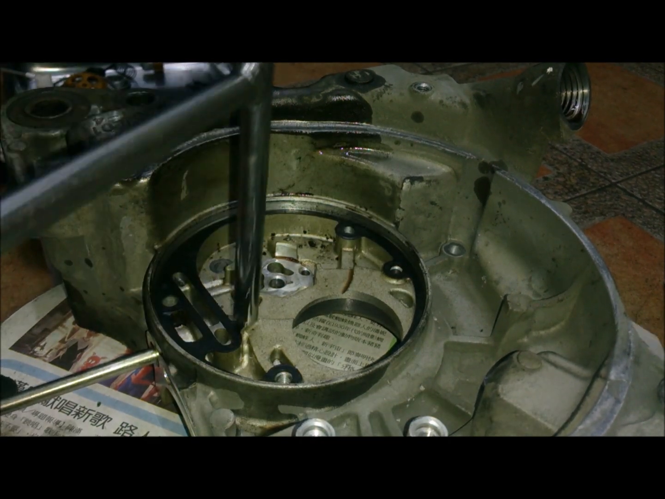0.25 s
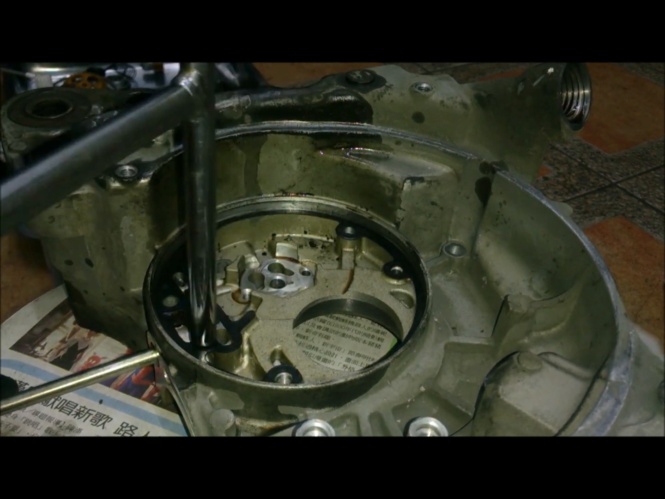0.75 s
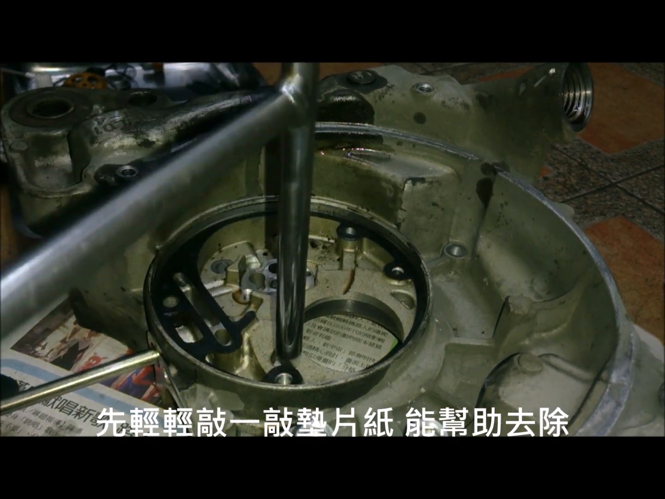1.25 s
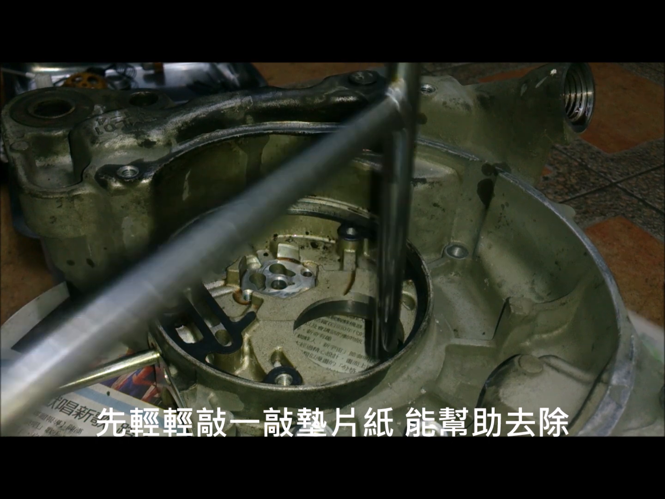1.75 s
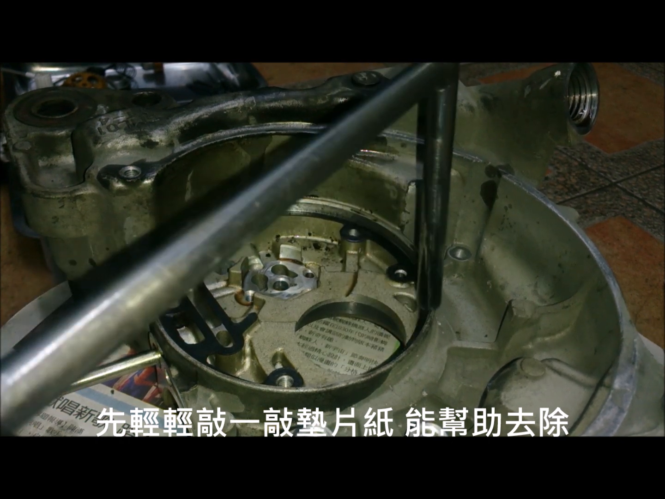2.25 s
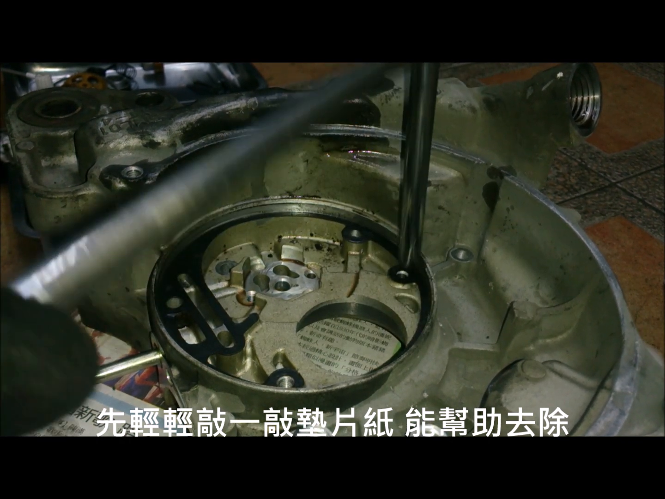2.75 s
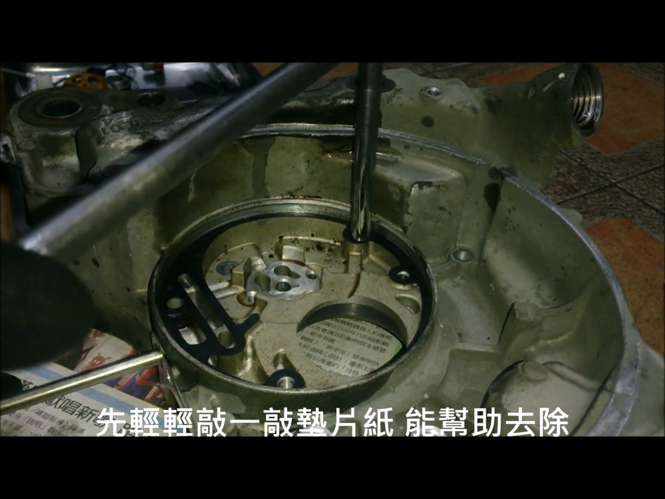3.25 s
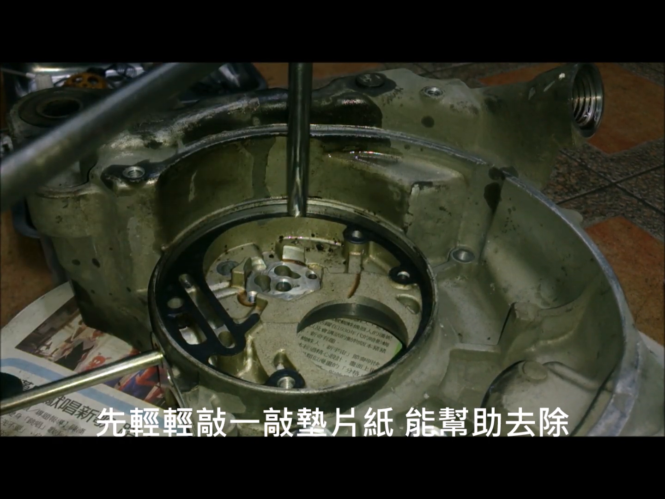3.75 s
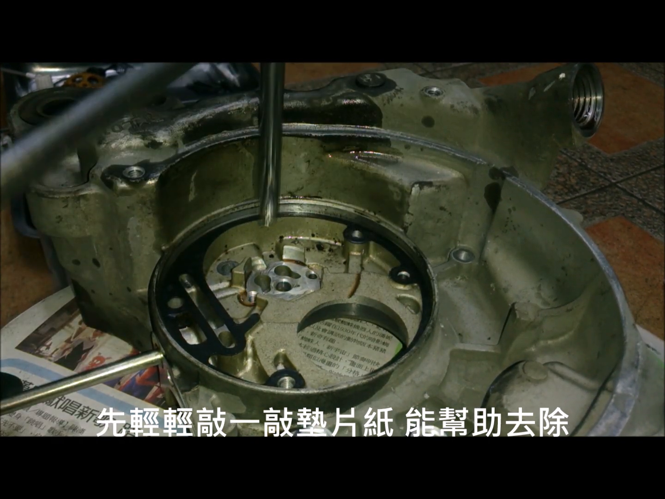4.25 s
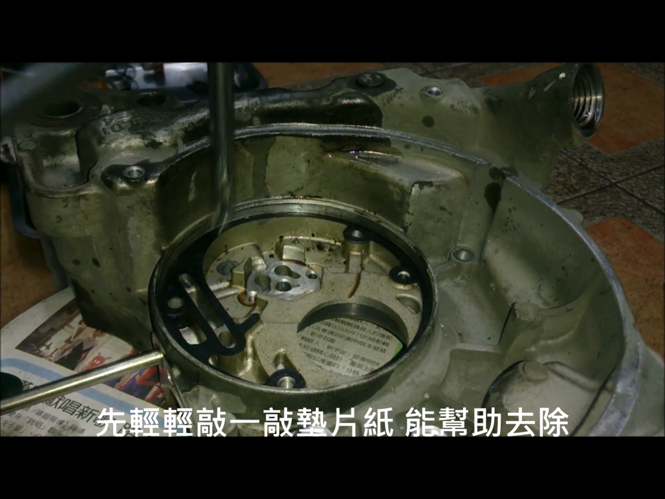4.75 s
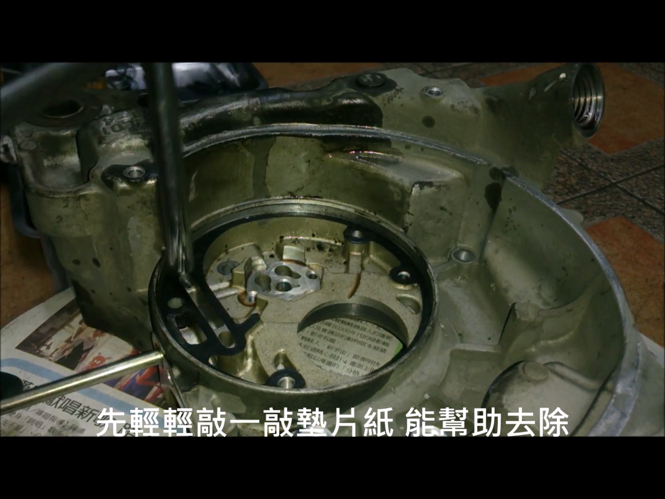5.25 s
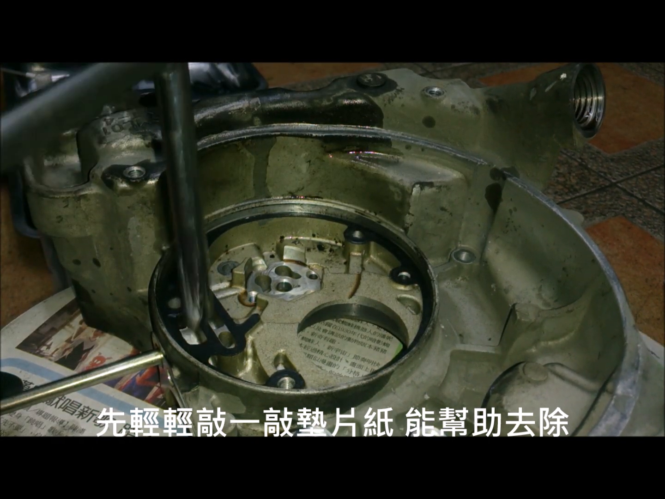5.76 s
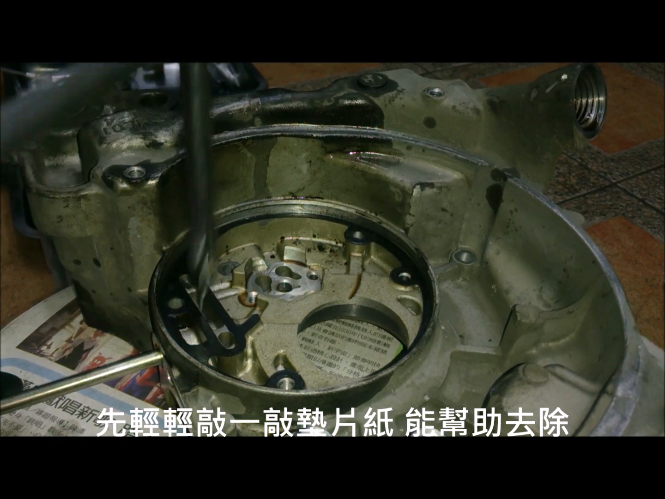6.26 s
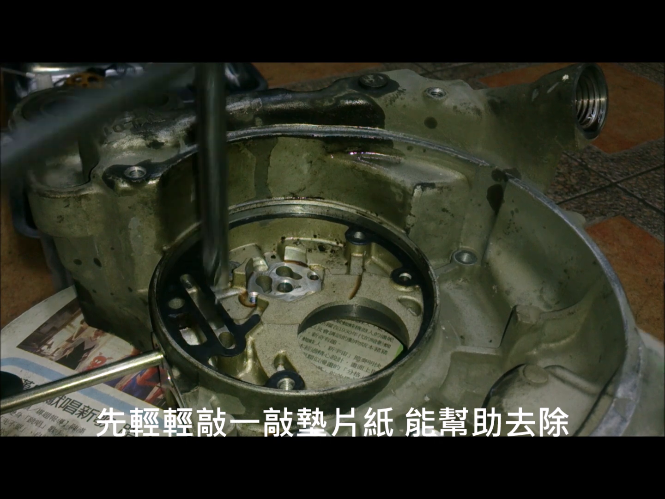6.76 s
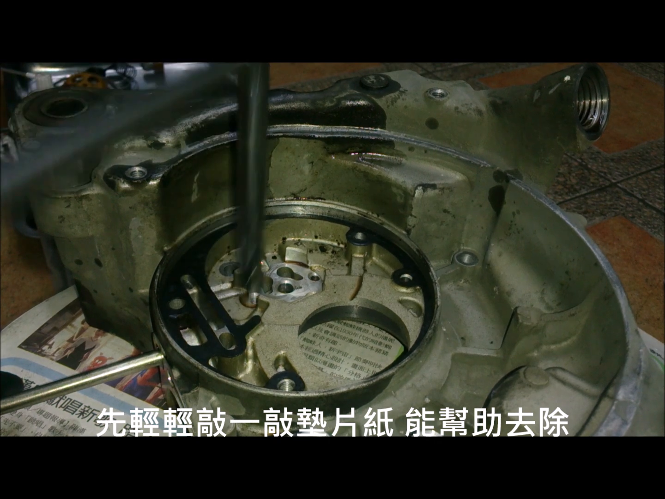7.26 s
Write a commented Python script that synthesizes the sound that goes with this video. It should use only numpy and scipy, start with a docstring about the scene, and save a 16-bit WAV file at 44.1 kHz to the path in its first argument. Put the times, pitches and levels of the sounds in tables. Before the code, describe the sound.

A steel rod raps an aluminium engine casing about sixteen times a second, bright metallic clatter with wind buffeting the microphone, mostly on the right.

```python
"""Workshop: a steel rod is tapped by hand with a steel bar against an aluminium engine casing,
played sped up, about 16 blows a second. Each blow is a noise burst (crack) plus short resonators
(casing thud, steel ringing) and a dense sizzle; which modes speak depends on spot and grip.
Decaying noise adds the room's reflections. Moving air buffets the microphone ports, mostly the right one,
as random pressure pulses; shaped noise makes a faint hiss and rumble."""
import sys
import numpy as np
from scipy import signal
from scipy.fft import rfft, irfft
from scipy.io import wavfile

SR = 44100
rng = np.random.default_rng(int(sys.argv[2]) if len(sys.argv) > 2 else 0)


def master(y):
    """Save y as 16-bit WAV."""
    cut = np.clip(np.atleast_2d(y).T, -1, 1)
    pcm = np.round(cut * 32767)  # scale
    wavfile.write(sys.argv[1], SR, pcm.astype(np.int16))


N = 331632

# blows: (time [s], crack level [dB], freedom of the steel to ring [dB])
BLOWS = [(0.2635, -22.5, -2), (0.3273, -22, -5), (0.3802, -26.5, -1.5), (0.431, -23, -37),
         (0.4957, -21.5, -8.5), (0.549, -21.5, -1), (0.6064, -22, 1), (0.666, -29.5, 11.5),
         (0.7254, -18, -20), (0.7853, -20, -18), (0.8474, -22.5, 4.5), (0.9063, -21, -2),
         (0.9618, -21.5, -12), (1.0215, -21.5, -3.5), (1.0818, -23.5, -1), (1.1418, -23, -3),
         (1.2033, -26, 10.5), (1.2611, -21, 0.5), (1.3249, -34, 16), (1.3815, -23.5, 3.5),
         (1.4405, -27.5, 10.5), (1.4945, -24.5, 5), (1.5533, -22.5, -6.5), (1.6182, -27, -7),
         (1.6692, -26.5, -6.5), (1.7169, -27.5, 11), (1.768, -32, 9.5), (1.821, -25.5, -9),
         (1.8695, -26.5, -2.5), (1.9346, -24, -3), (1.9927, -21, 1.5), (2.0634, -19, -5.5),
         (2.1535, -18, 3), (2.2327, -23.5, 7.5), (2.2976, -24.5, -8), (2.3496, -27.5, -1),
         (2.469, -26, -10), (2.5348, -23, -0.5), (2.6157, -31, -30), (2.6841, -19.5, 3), (2.7577, -16, 2),
         (2.8286, -18.5, 3.5), (2.8937, -20, -6), (2.9592, -21, 3.5), (3.0131, -22, 1.5), (3.0755, -21, -8),
         (3.19, -39.5, 5), (3.3061, -21, 3.5), (3.3604, -21.5, 1.5), (3.4107, -24, -3),
         (3.4629, -24.5, 9.3), (3.5236, -19.4, 3), (3.5958, -27, -10), (3.649, -27, -8), (3.703, -31.5, 5),
         (3.8075, -27, -5.5), (3.8714, -25.5, 4), (3.9285, -24, 7.5), (3.9813, -23.5, 3),
         (4.1607, -33, -27), (4.2185, -35, -3.5), (4.2703, -24.5, -5), (4.3203, -25.5, 12),
         (4.3705, -24, 0), (4.4112, -27, 3), (4.448, -30, -3), (4.4924, -28.5, 1), (4.5407, -26, 1),
         (4.579, -22, 0.1), (4.6357, -24, -2.0), (4.6696, -23, -1), (4.7162, -23, -2),
         (4.7683, -17.5, -8.5), (4.812, -42, 6.5), (4.8829, -16.5, -6), (4.9548, -20, 1),
         (5.023, -17.1, 1.5), (5.0896, -18.7, -1), (5.1519, -15.5, -5.5), (5.2112, -18.5, -17),
         (5.2667, -18, -10), (5.325, -18, -2.5), (5.381, -21.5, 3.5), (5.4497, -18, 1.5), (5.523, -14, -4),
         (5.5959, -17, 5.5), (5.666, -15.5, -5.5), (5.7355, -15.5, 2.5), (5.8071, -19, 1.5),
         (5.8722, -17.5, -3), (5.9437, -17.7, 1.8), (6.0105, -17.5, -0.5), (6.073, -21, 6.5),
         (6.135, -18, -9.1), (6.1992, -20, 5), (6.261, -16.5, 3), (6.3211, -17, -1.5), (6.3836, -16, -5.5),
         (6.4457, -19.9, 3), (6.5116, -12, -7), (6.5782, -16, -3.5), (6.6411, -16, -2.5),
         (6.709, -13.5, -6.5), (6.7701, -17, -3.3), (6.8372, -19.5, 3), (6.901, -21, 4), (6.9699, -17, -2),
         (7.0395, -17, -2.5), (7.107, -17, -6.5), (7.1793, -17.5, -1.3), (7.2529, -16.9, -1),
         (7.3272, -17.0, -1.5), (7.4049, -20, 3), (7.4811, -13.5, -5)]


def from_db(db):
    """Decibels to amplitude gain."""
    return 10 ** (np.asarray(db) / 20)


def rms_one(x):
    """Scale to unit rms."""
    return x / np.sqrt(np.mean(x ** 2) + 1e-20)


def at_hz(points, hz):
    """Interpolate a table over log frequency."""
    point_hz, value = np.transpose(points)
    return np.interp(np.log(hz), np.log(point_hz), value)


def bin_hz():
    """FFT bin frequencies, at least 1 Hz."""
    return np.maximum(np.arange(N // 2 + 1) * SR / N, 1)


def coloured(spectrum):
    """Stereo white noise given a spectrum; rms 1."""
    white = rng.standard_normal((2, N))
    return rms_one(irfft(rfft(white) * from_db(at_hz(spectrum, bin_hz())), N))


def drift(corner_hz):
    """Slow random wander: noise through two equal poles, rms 1."""
    r = np.exp(-2 * np.pi * corner_hz / SR)
    white = rng.standard_normal(N + SR)
    settled = signal.lfilter([1], [1, -2 * r, r * r], white)[SR:]
    return rms_one(settled)


def ring(clicks, hz, t60_s):
    """Two-pole resonator: a unit click starts a decaying sine of height about 1."""
    r = from_db(-60 / (t60_s * SR))
    w = 2 * np.pi * hz / SR
    return signal.lfilter([0, np.sin(w)], [1, -2 * r * np.cos(w), r * r], clicks + 1e-18)


def die_away(clicks, t60_s):
    """Each click becomes an exponential decay."""
    return signal.lfilter([1], [1, -from_db(-60 / (t60_s * SR))], clicks + 1e-18)


def struck(level_db):
    """One click per blow."""
    clicks = np.zeros(N)
    clicks[np.round(np.array(BLOWS)[:, 0] * SR).astype(int)] = from_db(level_db)
    return clicks


def partly_alike(first, second, share):
    """Mix two equal noises so that the result correlates with the first by share."""
    return share * first + np.sqrt(1 - share ** 2) * second


def cracks(crack_db, fall_t60_s, rise_t60_s, ports_alike):
    """A short burst of noise with a soft rise and a quick fall."""
    # (frequency [Hz], relative density [dB per Hz])
    crack_spectrum = [(700, -29), (1500, -2), (3500, 10), (4800, 3), (6000, 9), (8000, 2.5), (11000, -3.5),
                      (16000, -7.5)]
    clicks = struck(np.array(BLOWS)[:, 1])
    envelope = die_away(clicks, fall_t60_s) - die_away(clicks, rise_t60_s)
    out = from_db(crack_db) * envelope * coloured(crack_spectrum)
    out[1] = partly_alike(out[0], out[1], ports_alike)
    return out


def family_levels():
    """Level of each mode family per blow: strength, spot, freedom and chance."""
    # the rod wanders round the casing:
    # (time [s], ring level re crack of family 1 [dB], family 2 [dB], family 3 [dB], family 4 [dB])
    spots = [(0.25, -7.5, -38, -22, -21), (0.65, -9, -25, -22, -20), (1.1, -3, -31, -24.5, -27),
             (1.55, -0.5, -28, -23, -20), (1.75, -2.5, -35, -47, -27), (2.1, -16.5, -37, -40, -22.2),
             (2.6, -13.5, -27, -30.5, -20.5), (3.05, -10, -33, -33.5, -25), (3.35, -10, -21.5, -35, -30),
             (3.9, -14.5, -24, -47, -35), (4.5, -8, -24.5, -45.5, -45), (4.85, -2.5, -25, -42, -22),
             (5.15, -7.5, -20.5, -29.5, -13.5), (5.5, -12.5, -28, -25, -22.5), (6.0, -7, -47, -26.5, -29),
             (6.4, -12.5, -23, -23, -16), (6.9, -10, -25, -20.5, -15.5), (7.5, -2.5, -28, -18, -14)]
    # how far families 1 to 4 follow the freedom of the blow: (share [dB per dB])
    freedom_share = [.6, 0.75, 0.94, 1.4]
    spread_db = 1.5  # chance change of a family from blow to blow
    thud_share, thud_pivot_db = 0.23, -30

    s, crack_db, free_db = np.transpose(BLOWS)
    spot_s, *spot_db = np.transpose(spots)
    here_db = [np.interp(s, spot_s, column) for column in spot_db]
    ring_db = np.transpose([db + share * free_db for db, share in zip(here_db, freedom_share)])
    ring_db = ring_db + spread_db * rng.standard_normal(ring_db.shape)
    # where family 3 is choked, the casing thuds louder
    thud_db = thud_share * (thud_pivot_db - here_db[2])
    return np.c_[crack_db + thud_db, crack_db[:, None] + ring_db]


def ringing(family_db, spread_db, click_db, noise_db, t60_scale):
    """Every blow drives all modes; each rings roughly: a click and decaying noise drive short resonators."""
    # one row per family, family 0 is the thud: mode frequencies [Hz]
    mode_hz = [
        [330, 560, 780, 1720, 3500, 4375, 15480],
        [5890, 5960, 6150],
        [3760, 6690, 6640, 11670],
        [1870, 2870, 6820, 7080, 8768, 9745, 10100],
        [11200, 11946, 12750, 12935, 13940, 14820],
    ]
    # same layout: (relative level [dB], noise t60 and, before t60_scale, ring t60 [s])
    mode_ring = [
        [(-19.5, 0.072), (-20.5, 0.048), (-17, 0.04), (-14, 0.029), (-23, 0.045), (-23.5, 0.069), (-25, 0.039)],
        [(-1, 0.034), (0, 0.041), (-12, 0.038)],
        [(-3.5, 0.18), (2, 0.13), (-2.5, 0.19), (3.5, 0.075)],
        [(0, 0.075), (-3.5, 0.1), (-14, 0.1), (-7.5, 0.22), (8, 0.086), (2, 0.1), (7, 0.055)],
        [(3.5, 0.065), (7, 0.058), (-1, 0.047), (0, 0.048), (-9, 0.049), (4.5, 0.036)],
    ]
    ports_alike = 0.5  # noise correlation between ports

    out = np.zeros((2, N))
    for family, modes in enumerate(mode_ring):
        chance = rng.standard_normal((len(BLOWS), len(modes)))
        for k, (level_db, t60_s) in enumerate(modes):
            clicks = struck(family_db[:, family] + level_db + spread_db * chance[:, k])
            white = rng.standard_normal((2, N))
            white[1] = partly_alike(white[0], white[1], ports_alike)
            decaying_noise = from_db(noise_db) * die_away(clicks, t60_s) * white
            drive = from_db(click_db) * clicks + decaying_noise
            out += ring(drive, mode_hz[family][k], t60_scale * t60_s)
    return out


def sizzle(family_db, sizzle_db, t60_s):
    """Countless small high modes, too dense to tell apart, sound with the two upper families."""
    # (frequency [Hz], relative density [dB per Hz])
    sizzle_spectrum = [(2500, -17), (6500, -10), (11000, -6), (16000, -6)]
    clicks = struck(family_db[:, 3]) + struck(family_db[:, 4])
    return from_db(sizzle_db) * die_away(clicks, t60_s) * coloured(sizzle_spectrum)


def at_ports(x, lean_db):
    """Blows reach the left port louder (up lean_db, right down as much) and the right port later."""
    # (frequency [Hz], lag of the right port [samples])
    port_lag = [(6500, 2), (9000, 1), (13000, .65)]
    hz = bin_hz()
    lag_s = at_hz(port_lag, hz) / SR
    late = irfft(rfft(x[1]) * np.exp(-2j * np.pi * hz * lag_s), N)
    return np.array([x[0] * from_db(lean_db), late * from_db(-lean_db)])


def workshop(x, t60_s, onset_s):
    """Dense reflections, different at each port, dying away."""
    # (frequency [Hz], relative density [dB per Hz])
    room_spectrum = [(300, -20), (2000, 8), (7000, 0), (16000, -0.5)]
    t = np.arange(SR // 2) / SR
    envelope = from_db(-60 * t / t60_s) * (1 - np.exp(-t / onset_s))
    response = coloured(room_spectrum)[:, :len(t)] * envelope
    response = response / np.linalg.norm(response[0])
    return signal.fftconvolve(x[None], response, axes=1)[:, :N]


def gust_db(port):
    """Bell-shaped gusts add in power over a wavering breeze."""
    # strongest gusts: (centre time [s], port [0 left, 1 right], peak level [dB], half length to 1/e power [s])
    gusts = [(0.053, 1, -27, 0.0077), (0.18, 1, -26.5, 0.027), (0.264, 1, -29.5, 0.024),
             (0.522, 1, -28.5, 0.022), (0.696, 1, -29, 0.0072), (0.73, 1, -27, 0.018),
             (0.796, 1, -28, 0.024), (0.912, 1, -32.5, 0.03), (0.922, 0, -34, 0.0077),
             (0.942, 1, -32.5, 0.011), (1.045, 0, -33, 0.007), (1.067, 1, -33.5, 0.019),
             (1.072, 0, -32.5, 0.011), (1.124, 1, -23.5, 0.0076), (1.153, 0, -32, 0.0092),
             (1.174, 1, -22, 0.01), (1.196, 0, -43, 0.009), (1.236, 0, -28.5, 0.016),
             (1.28, 1, -31.3, 0.021), (1.422, 1, -26.5, 0.0082), (1.478, 0, -34, 0.014),
             (1.48, 1, -24.5, 0.0061), (1.594, 1, -26.5, 0.014), (1.709, 0, -31, 0.011),
             (1.836, 1, -34, 0.0066), (1.909, 1, -30, 0.011), (1.977, 1, -33, 0.015),
             (2.023, 1, -38, 0.018), (2.056, 1, -37.5, 0.0076), (2.245, 1, -26, 0.01),
             (2.246, 0, -38, 0.0089), (2.332, 0, -42, 0.026), (2.361, 1, -27, 0.012),
             (2.568, 0, -43.5, 0.015), (2.71, 1, -26.1, 0.012), (2.845, 1, -35, 0.0053),
             (3.033, 1, -29, 0.029), (3.09, 1, -28, 0.0075), (3.209, 1, -26, 0.0072),
             (3.267, 1, -30.5, 0.021), (3.344, 1, -28, 0.01), (3.464, 1, -29.5, 0.029),
             (3.528, 1, -29.0, 0.0065), (3.574, 1, -25, 0.0098), (3.624, 1, -25, 0.0084),
             (3.672, 1, -32, 0.021), (3.735, 1, -24.5, 0.0065), (3.925, 1, -32.5, 0.023),
             (3.98, 1, -26.5, 0.0085), (4.218, 1, -28.5, 0.0093), (4.347, 1, -29.5, 0.016),
             (4.46, 1, -33, 0.014), (4.557, 1, -25.5, 0.0061), (4.603, 1, -25, 0.021),
             (4.732, 1, -26.5, 0.014), (4.807, 1, -26.5, 0.013), (4.889, 1, -29.8, 0.015),
             (4.96, 1, -29.5, 0.012), (5.347, 1, -25, 0.0055), (5.488, 1, -25, 0.0038),
             (5.552, 1, -25.5, 0.014), (5.828, 1, -26, 0.008), (5.899, 1, -30.7, 0.012),
             (6.113, 0, -35.5, 0.012), (6.201, 1, -27, 0.017), (6.285, 1, -29.5, 0.01),
             (6.408, 1, -26.5, 0.0049), (6.456, 0, -41, 0.015), (6.883, 1, -26, 0.017),
             (6.969, 1, -25.5, 0.0061), (7.001, 1, -28.5, 0.0091), (7.06, 1, -29, 0.014),
             (7.192, 1, -26, 0.012), (7.327, 1, -29.9, 0.021), (7.443, 1, -25, 0.011),
             (7.502, 0, -40, 0.008)]
    # weaker puffs come at random around this level: (time [s], left level [dB], right level [dB])
    breeze = [(0.0, -61, -40.5), (0.4, -64, -48), (0.65, -57, -52), (0.9, -49, -46), (1.3, -47.79, -45),
              (1.8, -54, -35), (2.2, -71, -40.5), (2.5, -51.8, -43.5), (2.8, -58, -36.5),
              (3.3, -44.5, -42.76), (3.8, -61, -45.17), (4.1, -49, -37), (4.5, -56, -47.5), (4.8, -65, -44),
              (5.2, -64, -37.5), (5.7, -58, -37.5), (6.1, -50.5, -45), (6.6, -46.5, -38.5), (7.0, -65, -42),
              (7.5, -46, -43)]
    swing_db, swing_hz = 3, 17

    t = np.arange(N) / SR
    coarse_t = t[::64]
    own = [gust for gust in gusts if round(gust[1]) == port]
    centre_s, _, peak_db, half_s = np.transpose(own)[:, :, None]
    bells = np.exp(-((coarse_t - centre_s) / half_s) ** 2)
    power = np.sum(from_db(2 * peak_db) * bells, axis=0)
    breeze_columns = np.transpose(breeze)
    breeze_db = np.interp(t, breeze_columns[0], breeze_columns[1 + port]) + swing_db * drift(swing_hz)
    return 10 * np.log10(np.interp(t, coarse_t, power) + from_db(2 * breeze_db))


def buffeting(per_s, size_db, flutter_db, brighten):
    """Eddies pass a port as single pressure pulses; strong gusts carry more of the short, sharp ones."""
    # (pulse frequency [Hz], level re gust [dB])
    eddies = [(50, -15.5), (120, -8.5), (300, -7.5), (700, -9.5), (1500, -18.5), (2800, -28)]
    out = np.zeros((2, N))
    pitches_hz = np.geomspace(40, 2800, 9)
    for port in range(2):
        port_db = gust_db(port) + flutter_db * drift(78)
        heights = from_db(size_db * np.minimum(rng.exponential(1, N), 3.5))
        sizes = heights * rng.choice([-1, 1], N)
        chance = rng.random(N)
        dealt = rng.integers(0, len(pitches_hz), N)
        for k, hz in enumerate(pitches_hz):
            # each pitch gets a ninth of per_s, weighted to more of the short pulses
            born = (chance < per_s * np.sqrt(hz / 300) / SR) & (dealt == k)
            pulses = rms_one(ring(sizes * born, hz, 3.4 / hz))
            tilt_db = brighten * np.log2(hz / 150) * (port_db + 35.5)
            out[port] += pulses * from_db(at_hz(eddies, hz) + port_db + tilt_db)
    return signal.sosfilt(signal.butter(2, 2600, fs=SR, output="sos"), out)


def rumble(level_db):
    """Steady noise, strongest in the bass."""
    return from_db(level_db) * coloured([(300, -14.5), (1500, -60), (5000, -40)])


def hiss(level_db):
    """Steady noise, falling with frequency and steeply above 15 kHz."""
    return from_db(level_db) * coloured([(1000, 24), (15000, 6.5), (15800, -14.0), (16300, -30)])


def scene():
    """Blows nearer the left port, wind, and the still air of the workshop."""
    family_db = family_levels()
    blows = cracks(crack_db=-3, fall_t60_s=0.014, rise_t60_s=0.0032, ports_alike=0.68)
    blows += ringing(family_db, spread_db=0.15, click_db=-0.5, noise_db=-17, t60_scale=0.4)
    blows += sizzle(family_db, sizzle_db=-4, t60_s=0.17)
    reflections = from_db(-10.5) * workshop(blows[0], t60_s=0.21, onset_s=0.00043)
    wind = buffeting(per_s=1300, size_db=3.0, flutter_db=3.5, brighten=0.095)
    still_air = rumble(level_db=-50.5) + hiss(level_db=-61)
    return at_ports(blows, lean_db=2.0) + reflections + wind + still_air


def record(dry):
    """A quick limiter holds the peaks down and lets go within a blow; lowest bass and top are cut."""
    threshold_db, release_db_per_s = -15.15, 700
    dry = signal.sosfilt(signal.butter(2, 35, "high", fs=SR, output="sos"), dry)
    peak_db = 20 * np.log10(np.abs(dry).max(axis=0) + 1e-9)
    over_db = np.maximum(peak_db - threshold_db, 0)
    # instant attack, straight release in dB
    release_db = release_db_per_s * np.arange(N) / SR
    reduction_db = np.maximum.accumulate(over_db + release_db) - release_db
    top_cut = signal.cheby2(12, 70, 17300, fs=SR, output="sos")
    return signal.sosfilt(top_cut, dry * from_db(-reduction_db))


dry = scene()
out = record(dry)
master(out)
```